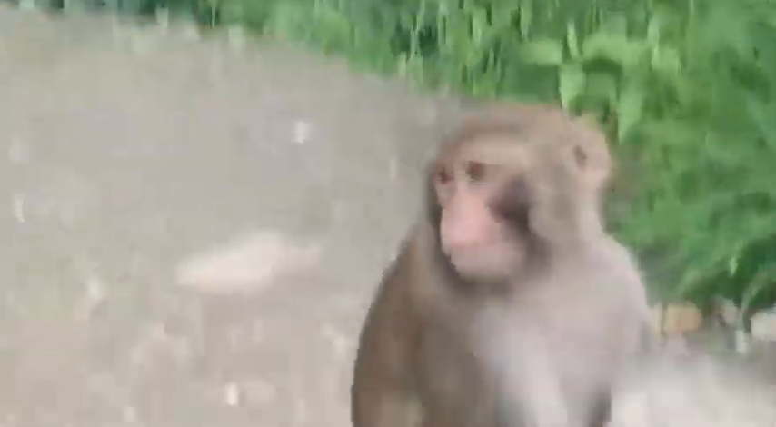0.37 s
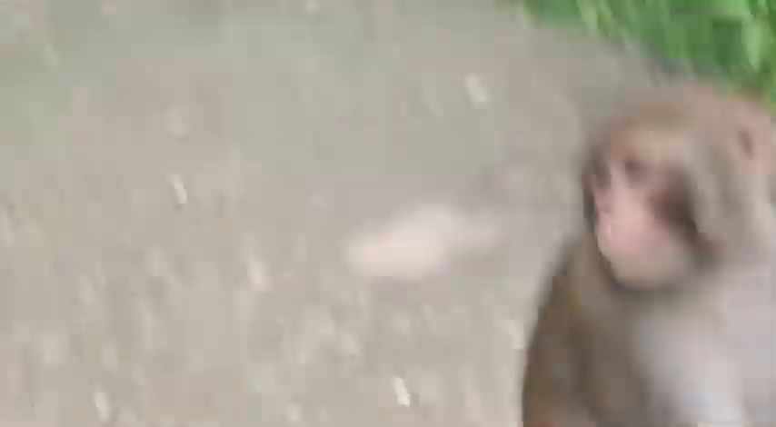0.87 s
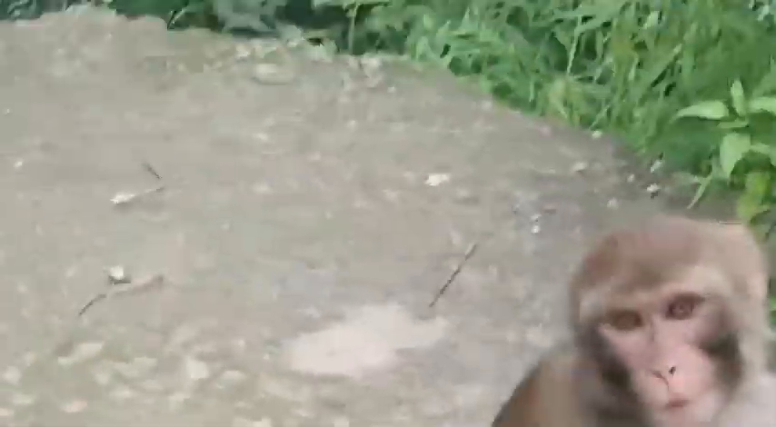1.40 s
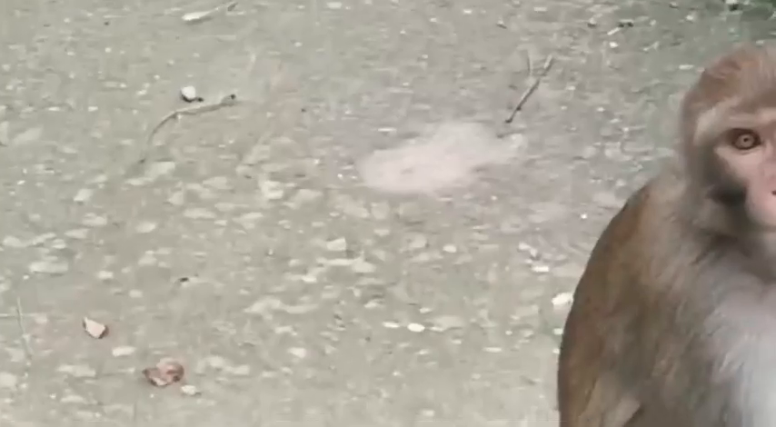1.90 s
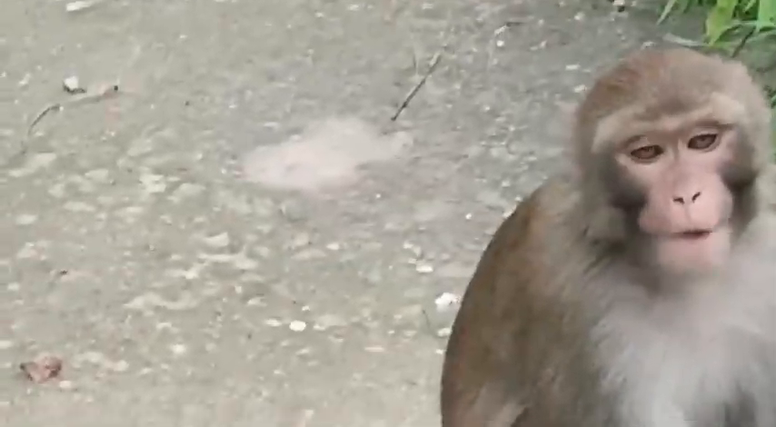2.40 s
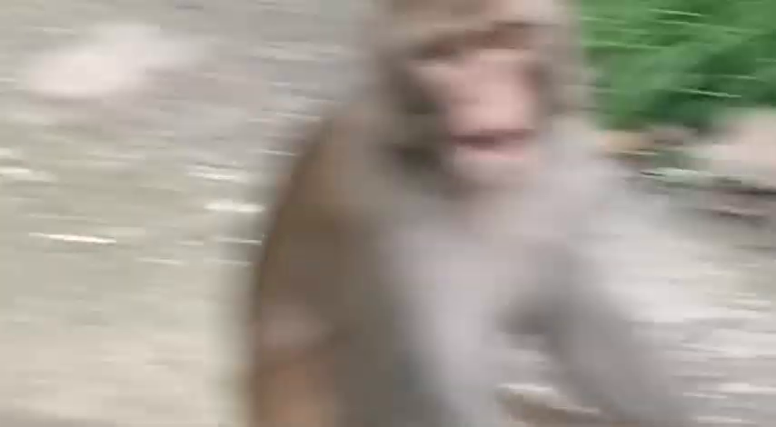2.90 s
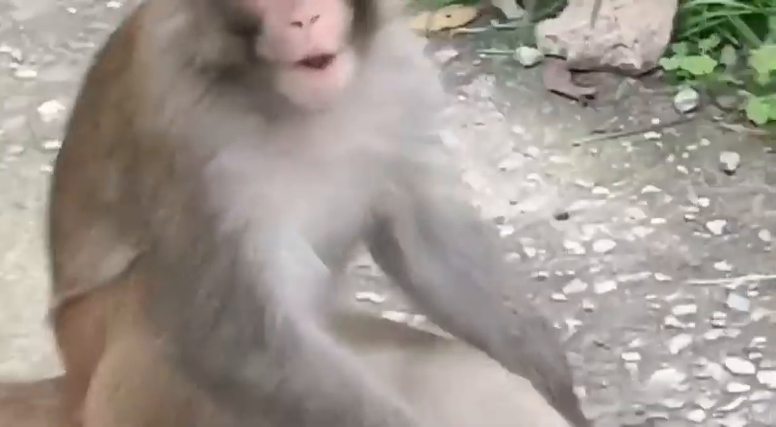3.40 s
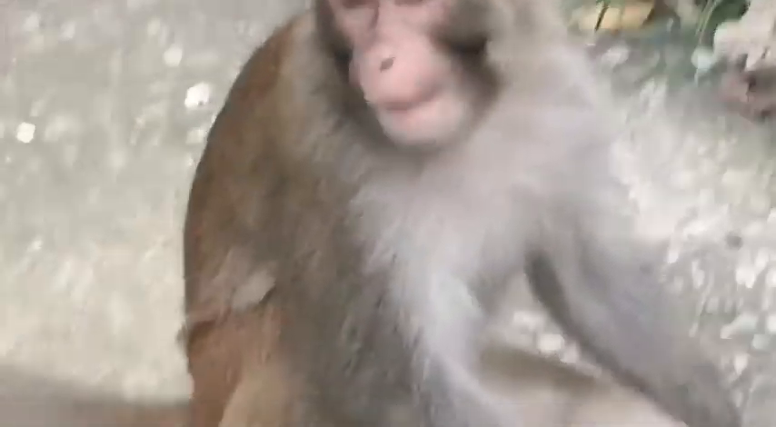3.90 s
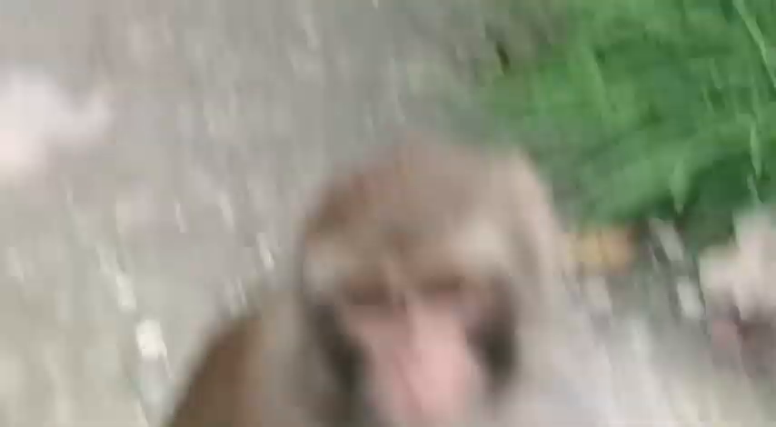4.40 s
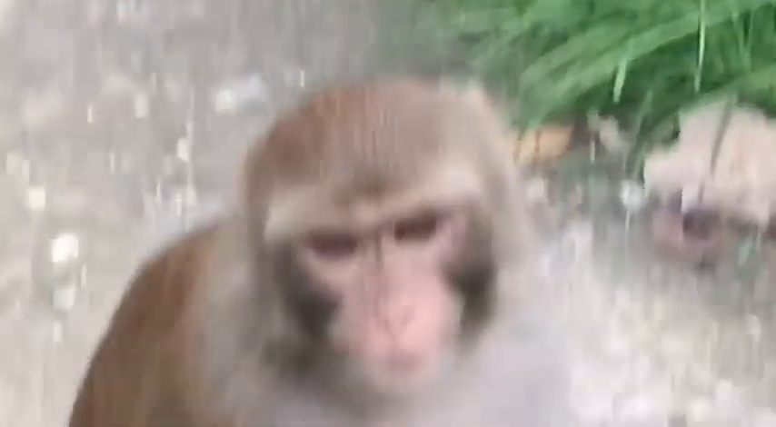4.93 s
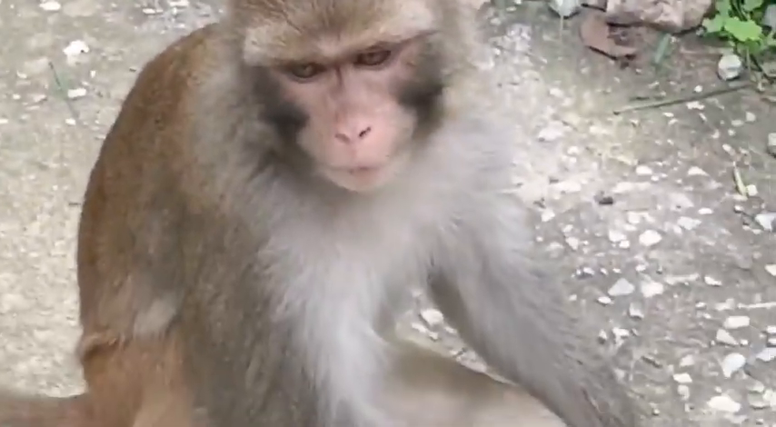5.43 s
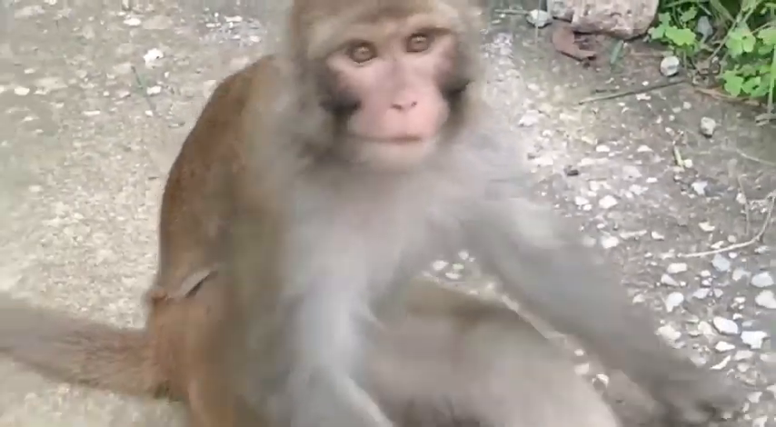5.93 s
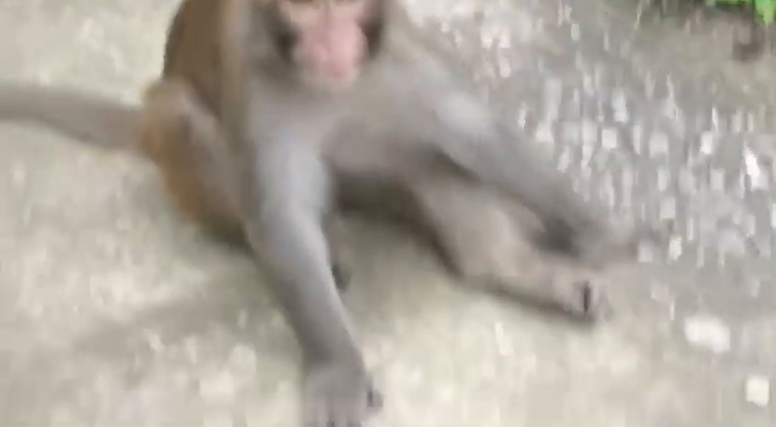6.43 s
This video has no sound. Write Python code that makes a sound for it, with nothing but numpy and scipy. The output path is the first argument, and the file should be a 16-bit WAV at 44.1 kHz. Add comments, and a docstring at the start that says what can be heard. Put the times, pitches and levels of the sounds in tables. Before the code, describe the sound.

Many small songbirds whistle, chip, trill and churr over one another among trees, with a near bird slurring down and up late on.

```python
"""A falling whistle opens, close by, and at once a high trill of upward flicks starts that ends in a buzz.
Small songbirds whistle, chip and churr across it in a wood; late on, a near bird slurs a whistle down and up.
Each bird is a gliding near-pure tone, echoed by the trees. Random chips blurred by echo make a far twitter,
its high band mostly heard as the trill's echo. A faint flickering rumble and a hiss, both filtered noise,
lie behind. The microphone hears almost nothing above 8 kHz."""
import sys
import numpy as np
from scipy import signal
from scipy.fft import rfft, irfft, next_fast_len
from scipy.io import wavfile
from scipy.ndimage import uniform_filter1d, map_coordinates

SR = 44100
rng = np.random.default_rng(int(sys.argv[2]) if len(sys.argv) > 2 else 0)


def undo_db(level):
    """Turn decibels back into plain size, where 20 dB means ten times bigger."""
    steps = np.asarray(level, float) / 20
    return 10 ** steps


def wav_out(sig):
    """Save sig, one row per channel (or a flat mono array), as 16-bit PCM at SR to the path in sys.argv[1]."""
    wavfile.write(sys.argv[1], SR, np.round(np.clip(np.atleast_2d(sig).T, -1, 1) * 32767).astype(np.int16))


N = 289296

# Gliding notes of the nearer birds. Each row: start in seconds, length in seconds, start pitch in Hz,
# end pitch in Hz, peak level in dB before flutter and echo.
GLIDE_NOTES = [(0, 0.039, 2480, 2164, -16.5), (0.087, 0.094, 3000, 2573, -19),
               (0.203, 0.025, 3510, 3700, -34.5), (0.211, .049, 1920, 1460, -42),
               (0.313, 0.02, 3460, 3606, -24.5), (0.375, 0.073, 1640, 1792, -41.5),
               (0.396, .026, 2100, 2045, -36), (0.41, 0.022, 3620, 3600, -24),
               (0.426, 0.027, 2174, 2700, -29), (0.446, 0.065, 2595, 2553, -19.5),
               (.65, 0.012, 5580, 4526, -19.5), (.768, .03, 4650, 4440, -22),
               (0.789, 0.082, 4460, 4400, -17), (.89, 0.028, 3560, 3046, -20),
               (0.956, 0.034, 3520, 2693, -22), (1.034, 0.034, 2327, 1534, -38.5),
               (1.159, 0.065, 2480, 2150, -31), (1.209, 0.097, 2242, 2210, -35.5),
               (1.251, 0.055, 5020, 3990, -32), (1.414, 0.037, 5250, 3570, -33),
               (1.424, 0.045, 3530, 2734, -30), (1.47, 0.025, 5290, 3600, -30),
               (1.535, 0.0085, 4960, 5040, -23.5), (1.564, 0.02, 4270, 3230, -26.5),
               (1.672, 0.015, 4610, 4770, -27.5), (1.689, 0.069, 4220, 3290, -34.5),
               (1.731, .036, 3350, 2884, -25), (1.845, 0.037, 3250, 3970, -33.5),
               (1.874, 0.027, 3160, 2446, -23.5), (1.878, .029, 4730, 4880, -28),
               (1.911, .021, 4430, 3580, -26), (1.914, 0.047, 2370, 2883, -29),
               (2.098, 0.075, 2250, 2176, -48.5), (2.114, .028, 5320, 5070, -21.5),
               (2.177, 0.0083, 3500, 3536, -19), (2.217, 0.025, 3670, 3400, -20.5),
               (2.324, 0.051, 2170, 2680, -33.5), (2.368, .115, 1710, 1754, -38.5),
               (2.416, 0.028, 3980, 3640, -34), (2.501, 0.028, 4300, 3940, -25),
               (2.592, 0.028, 4450, 3550, -38.5), (2.606, 0.045, 4530, 3960, -38),
               (2.673, .054, 2650, 1963, -25.5), (2.722, .094, 2050, 1794, -40.5),
               (2.848, .028, 6030, 4480, -26.5), (2.912, .05, 3630, 4230, -24),
               (2.953, 0.014, 5550, 4130, -28.5), (3.001, 0.073, 3900, 4060, -24.5),
               (3.083, 0.02, 3340, 3070, -24), (3.138, 0.023, 3440, 3050, -26),
               (3.302, .03, 3770, 2830, -21.5), (3.416, .028, 4600, 4600, -25.5),
               (3.425, 0.083, 5120, 5260, -31), (3.614, 0.097, 6440, 6450, -35),
               (3.726, 0.043, 4170, 3770, -23), (3.757, 0.036, 3970, 4280, -21.5),
               (3.928, 0.029, 6520, 6666, -20), (4.245, .054, 6480, 6220, -12.5),
               (4.254, .15, 6530, 6637, -10), (4.541, 0.042, 5730, 4100, -33),
               (4.578, 0.055, 3190, 2450, -41), (4.752, 0.057, 3240, 2840, -28),
               (4.862, 0.013, 3870, 5900, -18.5), (4.885, 0.026, 5340, 4800, -21),
               (5.057, .018, 3790, 5780, -14.5), (5.072, 0.03, 5500, 4450, -18),
               (5.146, 0.041, 2620, 2640, -34), (5.517, 0.019, 2840, 2695, -27.5),
               (6.107, 0.024, 4050, 4770, -16.5), (6.152, 0.029, 4380, 5190, -16.5),
               (6.22, .1, 4440, 3990, -22), (6.377, 0.046, 7650, 6730, -37.5),
               (6.401, 0.022, 6810, 5890, -18.5), (6.546, 0.023, 7340, 6436, -23.5)]
GLIDE_HALFWAY = .56  # share of the glide done at the middle of the note
# Arched notes. Each row: start in seconds, length in seconds, pitch at both ends in Hz, middle pitch in Hz,
# peak level in dB before flutter and echo.
ARCHED_NOTES = [(0.345, 0.032, 2176, 2016, -34.5), (0.737, 0.024, 2140, 2403, -27.5),
                (1.31, .049, 1590, 1775, -44), (1.343, .015, 3710, 4080, -26),
                (1.548, .022, 4100, 4430, -20), (1.655, .032, 2840, 2144, -36),
                (2.931, 0.016, 4770, 5270, -23.5), (2.948, .035, 4280, 4680, -18.5),
                (3.279, 0.075, 4660, 4350, -26.5), (3.526, 0.035, 3373, 3504, -27),
                (3.674, .052, 4480, 5173, -21.5), (3.986, .028, 4833, 5120, -11),
                (3.997, .122, 5314, 4900, -24), (4.273, 0.054, 3444, 3320, -28.5),
                (4.399, 0.13, 3825, 4006, -29), (4.605, 0.022, 3750, 3910, -26),
                (4.836, 0.025, 6520, 6400, -26.5), (5.032, 0.034, 6640, 6420, -16.5)]
# Rolls of rising steps. Each row: start in seconds, length in seconds, start pitch in Hz, end pitch in Hz,
# peak level in dB before flutter and echo.
RISING_ROLLS = [(2.546, .088, 2245, 2743, -21.5), (2.692, .11, 2664, 3396, -23)]
ROLL_STEPS_PER_S = 50

# Pitch ranges of the far twitter's three bands. Each row: low in Hz, high in Hz.
TWITTER_BANDS = [(2100, 4200), (3600, 5700), (5650, 7200)]
# Swells of blurred twitter, one list for each of the three bands; the high one is mostly the trill's echo.
# Each row: start in seconds, end in seconds, rms level in dB.
TWITTER_SWELLS = [
    [(-.2, .08, -25.5), (.08, .8, -36.5), (1.7, 2.2, -34.5), (2.4, 4.35, -34), (4.75, 5.05, -37),
     (5.1, 5.8, -42), (5.95, 6.45, -41), (4.52, 4.68, -42)],
    [(-.2, .1, -30.5), (.6, 1.1, -36.5), (1.4, 2.4, -38.5), (2.4, 4.25, -35), (4.4, 4.8, -41),
     (4.8, 5.33, -31.5), (5.4, 5.8, -40), (5.85, 6.05, -46), (6.05, 6.6, -36)],
    [(.28, 1.2, -33.5), (1.1, 2.45, -26.5), (2.45, 3.42, -39.5), (3.85, 4.08, -36.5), (4.22, 4.4, -31.5),
     (4.45, 5.7, -44.5), (4.97, 5.28, -37), (5.65, 5.8, -34), (6.2, 6.4, -51.5), (6.47, 6.8, -32.5)],
]
SWELL_EDGE_S = 0.11  # rise and fade
BETWEEN_DB = (-59, -50.5, -45.5)  # what still sounds between swells, by band

# Low rumble. Each row: time in seconds, rms level in dB.
RUMBLE_LEVEL = [(0, -70.5), (.36, -57), (.47, -67.5), (.58, -58.5), (.72, -64.5), (.78, -69), (2.3, -76),
                (2.52, -62), (2.9, -59.5), (2.96, -69), (3.05, -57.5), (3.53, -51.5), (4.24, -52),
                (4.33, -56), (4.68, -54), (5.66, -51), (5.74, -66.5), (6.17, -55), (6.27, -72.5),
                (6.56, -60.5)]
# Tone of the rumble. Each row: frequency in Hz, relative level in dB.
RUMBLE_TONE = [(88, -63), (150, -37.5), (222, -25), (399, -5), (538, 4.5), (954, -7.5), (1410, 2),
               (1910, 1), (2050, -35.5), (2600, -39), (3380, -35), (5720, -120)]
# Moments when the low rumble flickers up. Each row: time in seconds, 6 ms ahead of the height;
# level at the height in dB.
RUMBLE_FLICKERS = [(0.266, -56.5), (.329, -63), (.599, -56), (.678, -58), (.717, -61), (1.02, -49.5),
                   (1.064, -59.5), (1.245, -59), (1.735, -60), (1.81, -56), (2.07, -57.5), (4.279, -44),
                   (5.781, -59), (6.219, -56.5), (6.324, -49.5)]
# Tone of these flickers. Each row: frequency in Hz, relative level in dB.
RUMBLE_FLICKER_TONE = [(60, -26), (150, 3), (500, 2.5), (1300, 7), (1800, 7.5), (2500, -64)]
# Between the trill's flicks the low noise flickers up briefly around 1.2 kHz.
# By phrase: delay after the flick in seconds, usual level in dB; then the scatter of that level in dB.
GAP_FLICKER_AFTER_S, GAP_FLICKER_DB, GAP_SCATTER_DB = (0.0062, 0.022, 0.016), (-58.5, -61, -67.5), 2
# Tone of the noise in those gaps. Each row: frequency in Hz, relative level in dB.
GAP_FLICKER_TONE = [(500, -30), (900, -8), (1250, 1.5), (1600, -10.5), (2100, -35.5), (2600, -81)]
# Steady hiss of the wood. Each row: frequency in Hz, relative level in dB.
HISS_TONE = [(880, -60), (1500, -25), (2910, -5), (3680, -8), (4110, -2.5), (6460, -3.5), (7180, -21.5),
             (7760, -32.5), (8100, -80), (10500, -109), (17800, -120)]
# Deep murmur. Each row: frequency in Hz, relative level in dB.
MURMUR_TONE = [(12, -37.5), (20, 4.5), (59, -12.5), (354, -22.5), (653, -20.5), (1050, -29.5), (1250, -2.5),
               (1500, -16.5), (1950, -39), (3300, -120)]
HISS_DB, MURMUR_DB = -37, -73.5  # rms

# The trill's phrases. Each row: first flick in seconds, first gap in seconds, growth of the gap in seconds a flick.
TRILL_PHRASES = [(.0375, .1125, -.0005), (.9991, .0595, .0007), (1.8342, .0717, .0001)]
# How many flicks each phrase holds, one count a phrase.
FLICK_COUNTS = [9, 13, 8]
# The flick in each phrase. Each row: rise in seconds, rest in seconds, lowest pitch in Hz, usual top pitch in Hz,
# growth in level over the climb in dB.
FLICK_SHAPES = [(.0105, 0.0039, 3701, 6660, 15), (.0125, .009, 4498, 6540, 19.5),
                (.016, .0056, 4310, 6460, 16)]
# Ticks in each phrase, one list a phrase. Each row: seconds after the flick, level in dB against the song's effort.
TRILL_TICKS = [
    [(-.0155, -14.5)],
    [(.0295, -7.5)],
    [(.027, -13), (.046, -14)],
]
# The triller's effort. Each row: time in seconds, peak level in dB before scatter.
TRILL_EFFORT = [(0, -21), (.2, -12), (.8, -6.5), (1, -10), (1.08, -1.5), (1.2, -6), (1.6, -13.5),
                (2.02, -4.5), (2.35, -11)]
FLICK_SCATTER_DB, TOP_SCATTER_HZ, TICK_SCATTER_HZ = 3, 83, 190
# The buzz that ends the trill. Each row: time in seconds, low pitch in Hz, peak level in dB before wavering.
TRILL_BUZZ = [(2.3, 5860, -90), (2.37, 5773, -22), (2.75, 5740, -24), (2.94, 5695, -21.5),
              (2.98, 5385, -24.5), (3.22, 5480, -27.5), (3.3, 5130, -94.5)]
BUZZ_TOP_HZ = 6720

# Churrs, fast falling sweeps. Each row: start in seconds, length in seconds, low pitch in Hz, high pitch in Hz,
# peak level in dB before wavering.
CHURR_NOTES = [(0.216, 0.028, 2050, 3110, -28.5), (0.621, 0.085, 4116, 6580, -29.5),
               (1.748, 0.079, 2700, 3600, -37), (2.906, 0.066, 3633, 5530, -19.5),
               (3.072, 0.12, 2687, 3580, -30), (3.465, .1, 2553, 3590, -30), (3.699, 0.06, 3956, 5450, -23),
               (3.765, .12, 2686, 3492, -30), (4.724, 0.048, 3440, 5440, -34.5),
               (4.8, .145, 1509, 3072, -26.5), (4.89, 0.075, 4055, 5320, -25.5),
               (5.085, 0.07, 3643, 5500, -20.5), (5.211, .14, 1490, 3218, -22),
               (6.127, 0.085, 3780, 4994, -22.5)]
SWEEPS_PER_S, MORE_PER_KHZ = 45, 11  # higher churrs sweep faster

# The near bird's calls. Each row: start in seconds, stretch in time as a factor, gain in dB,
# swell from start to end in dB.
SLURRED_CALLS = [(5.661, .99, 1.5, -1), (6.186, 1.03, -3, 0)]
# Its falling and rising whistle. Each row: seconds into the unstretched call, pitch in Hz, rms level in dB
# before the call's gain and swell.
SLUR_SHAPE = [(0, 2612, -31.5), (0.022, 2560, -19), (0.045, 2250, -13), (.07, 2049, -18),
              (0.1, 2090, -17.5), (.119, 2700, -27), (0.139, 3073, -17.5), (0.168, 3050, -8.5),
              (0.199, 2887, -9), (0.234, 2728, -13), (0.254, 2707, -25.5)]

# Echo of the trees. Each row: frequency in Hz, time to fall by 60 dB in seconds.
TREE_ECHO = [(1500, 2.16), (3000, 1.56), (5000, 1.2), (7000, 0.8)]
# Response of the microphone. Each row: frequency in Hz, gain in dB.
MICROPHONE_RESPONSE = [(20, -28.5), (70, 2.5), (6800, -2), (7200, -1), (7600, -3.5), (7800, -25.5),
                       (8200, -40), (8300, -110)]


def unit(x):
    """Scaled to rms 1."""
    return x / np.sqrt(np.mean(x ** 2) + 1e-20)


def along(points, hz):
    """Reads (Hz, value) points on a log frequency axis."""
    f, v = np.transpose(points)
    return np.interp(np.log(hz + 1), np.log(f + 1), v)


def curves(rows):
    """One value per sample for each column after the time."""
    s, *cols = np.transpose(rows)
    return [np.interp(np.arange(N) / SR, s, c) for c in cols]


def wobble(rate, size=N):
    """A smooth random curve, rate knots a second."""
    return map_coordinates(rng.standard_normal(N // 64), [np.arange(size) * rate / SR])


def coloured(x, spectrum):
    """Sound through a (Hz, dB) response."""
    m = next_fast_len(N + 8192)
    response = undo_db(along(spectrum, np.fft.rfftfreq(m, 1 / SR)))
    return irfft(rfft(x, m) * response, m)[..., :N]


def patchy(spectrum, depth_db, wide, long):
    """Noise of rms 1 whose gain varies in patches, wide bins by long frames."""
    t, z = signal.stft(rng.standard_normal(N), nperseg=512)[1:]  # t counts samples
    field = uniform_filter1d(rng.standard_normal(z.shape), wide, 0)
    field = uniform_filter1d(field, long, 1)
    depth = np.interp(t, np.arange(N), depth_db * np.ones(N))
    gain = undo_db(depth * unit(field))
    z = z * gain / np.sqrt(np.mean(gain ** 2, axis=0))
    return unit(coloured(signal.istft(z, nperseg=512)[1][:N], spectrum))


def add(track, s, sound):
    """Lays a sound on the track at time s."""
    room = track[max(round(s * SR), 0):][:len(sound)]
    room += sound[:len(room)]


def bursts(rows, width_s):
    """A bell-shaped gate for each (s, peak dB)."""
    gate, t = np.zeros(N), np.arange(-.012, .012, 1 / SR)
    for s, peak_db in rows:
        add(gate, s - .006, undo_db(peak_db) * np.exp(-(t / width_s) ** 2))
    return gate


def sine(hz, second_db=-40, third_db=-60):
    """The syrinx: a near-pure tone with overtones at two and three times its pitch."""
    phase = 2 * np.pi * np.cumsum(hz) / SR
    return np.sin(phase) + undo_db(second_db) * np.sin(2 * phase) + undo_db(third_db) * np.sin(3 * phase)


def glide(length, start_hz, middle_hz, end_hz, edge, waver_hz=0):
    """A note whose pitch bends through three points and may waver, with soft ends."""
    u = np.linspace(0, 1, round(length * SR))
    slope, bend = end_hz - start_hz, 2 * (start_hz + end_hz - 2 * middle_hz)
    hz = middle_hz + slope * (u - .5) + bend * (u - .5) ** 2
    if waver_hz:
        hz = hz + waver_hz * wobble(100, size=len(u))
    return sine(hz) * signal.windows.tukey(len(u), np.clip(edge, 0, 1))


def trees(x, near_db, near_s, far_db):
    """Direct sound, a quick scatter off leaves and a long echo off trunks, new for every moment."""
    out, step = np.zeros(N + 2 * SR), SR // 5
    t, fade = np.arange(SR // 8) / SR, np.hanning(2 * step + 1)[:-1]
    padded = np.pad(x, (step, 2 * step))
    for k in range(0, N + step, step):
        hz, s, z = signal.stft(rng.standard_normal(SR), SR, nperseg=256)
        decay = undo_db(-60 * s / along(TREE_ECHO, hz)[:, None])
        trunks = signal.istft(z * decay, SR, nperseg=256)[1][:SR]
        leaves = rng.standard_normal(len(t)) * undo_db(-60 * t / near_s)
        tail = undo_db(far_db) * trunks / np.linalg.norm(trunks)
        tail[:len(t)] += undo_db(near_db) * leaves / np.linalg.norm(leaves)
        add(out, k / SR + .004, signal.fftconvolve(fade * padded[k:k + 2 * step], tail))
    return x + out[step:step + N]


def beats():
    """(phrase, s) of every flick of the trill: within a phrase the gaps change evenly."""
    return [(p, first + gap * k + growth * k * (k - 1) / 2)
            for p, (first, gap, growth) in enumerate(TRILL_PHRASES) for k in range(FLICK_COUNTS[p])]


def whistlers():
    """Notes of the nearer birds, and rolls that climb in small upward steps; moving air makes them flutter."""
    out = np.zeros(N)
    notes = [(s, length, a, a + GLIDE_HALFWAY * (b - a), b, db) for s, length, a, b, db in GLIDE_NOTES]
    notes += [(s, length, ends, middle, ends, db) for s, length, ends, middle, db in ARCHED_NOTES]
    for s, length, start_hz, middle_hz, end_hz, db in notes:
        add(out, s, undo_db(db) * glide(length, start_hz, middle_hz, end_hz, edge=0.31, waver_hz=64.8))
    for s, length, start_hz, end_hz, db in RISING_ROLLS:
        t = np.arange(0, length, 1 / SR)
        cycle = t * ROLL_STEPS_PER_S % 1
        hz = start_hz + (end_hz - start_hz) * (t / length) ** 0.47 + 500 * (cycle - .5)
        pulses = np.sin(np.pi * cycle ** 0.9) * signal.windows.tukey(len(t), .12)
        add(out, s, undo_db(db) * pulses * sine(hz))
    flutter = undo_db(2.6 * wobble(90))
    return trees(out * flutter, near_db=-3, near_s=0.17, far_db=-7.0)


def far_twitter():
    """Very many quick chips at random, blurred by echo into three bands of distant twitter that swell and fade."""
    out, t = np.zeros(N), np.arange(N) / SR
    for (low_hz, high_hz), rows, between_db in zip(TWITTER_BANDS, TWITTER_SWELLS, BETWEEN_DB):
        notes = np.zeros(N)
        for when, start, end, length, size in rng.random((1500, 5)):
            # averaging two draws puts most chips mid-range
            start_hz = low_hz + (high_hz - low_hz) * (start + end) / 2
            end_hz = low_hz + (high_hz - low_hz) * (end + size) / 2
            chip = glide(0.00789 + 0.01523 * length, start_hz, (start_hz + end_hz) / 2, end_hz, edge=0.13)
            add(notes, when * N / SR, undo_db(1.4 * size) * chip)
        blur = trees(notes, near_db=-1.0, near_s=0.065, far_db=5)
        swells = [undo_db(db) * np.clip(.5 + np.minimum(t - a, b - t) / (2 * SWELL_EDGE_S), 0, 1)
                  for a, b, db in rows]
        level = np.sqrt(undo_db(between_db) ** 2 + np.sum(np.square(swells), axis=0))
        # evened out over a quarter second, so that the swells set the level
        out += level * blur / np.sqrt(np.abs(uniform_filter1d(blur ** 2, size=SR // 4)) + 1e-9)
    return out


def background():
    """Filtered noise: a low rumble that flickers, most when faint and in the trill's gaps, a hiss, a deep murmur."""
    db, = curves(RUMBLE_LEVEL)
    depth_db = np.clip(4.0 + 0.33 * (-58.0 - db), 1, 10.5)
    rumble = undo_db(db) * patchy(RUMBLE_TONE, depth_db, wide=3, long=3)
    gap_rows = [(s + GAP_FLICKER_AFTER_S[p], GAP_FLICKER_DB[p] + GAP_SCATTER_DB * rng.standard_normal())
                for p, s in beats()]
    rumble_flickers = bursts(RUMBLE_FLICKERS, width_s=0.0085) * patchy(RUMBLE_FLICKER_TONE, 4.7, wide=5, long=2)
    gap_flickers = bursts(gap_rows, width_s=0.0034) * patchy(GAP_FLICKER_TONE, 4, wide=5, long=2)
    hiss = undo_db(HISS_DB) * patchy(HISS_TONE, 4.8, wide=4, long=5)
    murmur = undo_db(MURMUR_DB) * patchy(MURMUR_TONE, 3.4, wide=2, long=8)
    return rumble + rumble_flickers + gap_flickers + hiss + murmur


def triller():
    """Each flick shoots up, growing louder, and rests on its top pitch; ticks go with it; a buzz ends the song."""
    out = np.zeros(N)
    for (p, s), chance in zip(beats(), rng.standard_normal((sum(FLICK_COUNTS), 6))):
        rise, rest, low_hz, usual_hz, growth_db = FLICK_SHAPES[p]
        # one level for the flick, then one for each tick; the pitches likewise
        db = np.interp(s, *np.transpose(TRILL_EFFORT)) + FLICK_SCATTER_DB * chance[::2]
        top_hz = usual_hz + TOP_SCATTER_HZ * chance[1]
        ticks_hz = usual_hz + TICK_SCATTER_HZ * chance[3::2]
        t = np.arange(-rise, rest, 1 / SR)
        climb = np.clip(-t / rise, 0, 1)  # 1 at the foot, 0 at the top
        accent_db = -5.1 * np.clip(climb / 0.022, 0, 1)  # a last lift on reaching the top
        fall_db = -13 * np.clip(t / rest, 0, 1)
        size = undo_db(db[0] + accent_db - growth_db * climb + fall_db) * signal.windows.tukey(len(t), .15)
        add(out, s + 0.003 - rise, size * sine(top_hz - (top_hz - low_hz) * climb ** 1.4))
        for (after, tick_db), effort_db, hz in zip(TRILL_TICKS[p], db[1:], ticks_hz):
            add(out, s + after, undo_db(effort_db + tick_db) * glide(0.0087, hz + 80, hz, hz - 80, edge=0.36))
    low_hz, db = curves(TRILL_BUZZ)
    swings_per_s = 140 * (1 + 0.37 * wobble(60))
    swing = .5 + .5 * np.cos(2 * np.pi * np.cumsum(swings_per_s) / SR)  # the pitch lingers at both turns
    out += undo_db(db + 3.3 * wobble(150)) * sine(low_hz + (BUZZ_TOP_HZ - low_hz) * swing)
    return trees(out, near_db=-5.5, near_s=0.037, far_db=-0.5)


def churrers():
    """A tone swept down again and again, so fast that it buzzes; each sweep is loudest early."""
    out = np.zeros(N)
    for s, length, low_hz, high_hz, db in CHURR_NOTES:
        count = round(length * SR)
        rate = SWEEPS_PER_S + MORE_PER_KHZ * high_hz * 1e-3
        cycle = np.cumsum(rate * (1 + 0.11 * wobble(50, size=count))) / SR % 1
        pulses = np.sin(np.pi * cycle ** 0.64) * signal.windows.tukey(count, .15)
        size = undo_db(db + 4.85 * wobble(100, size=count)) * pulses
        add(out, s, size * sine(high_hz - (high_hz - low_hz) * cycle))
    return trees(out, near_db=4.0, near_s=0.17, far_db=-2.5)


def near_bird():
    """A clean slurred whistle, strong at three times its pitch on the low notes, with a long echo."""
    out = np.zeros(N)
    into, hz, db = np.transpose(SLUR_SHAPE)
    for s, stretch, gain_db, swell_db in SLURRED_CALLS:
        t = np.arange(into[0], into[-1], 1 / (SR * stretch))
        smooth_hz = uniform_filter1d(np.interp(t, into, hz), size=300)
        third_db = np.interp(smooth_hz, [2100, 2500, 3000], [-15, -24, -60])
        level_db = gain_db + swell_db * (t / into[-1] - .5) + np.interp(t, into, db)
        size = np.sqrt(2) * undo_db(level_db) * signal.windows.tukey(len(t), .08)  # rms to peak
        add(out, s, size * sine(smooth_hz, second_db=-28.0, third_db=third_db))
    return trees(out, near_db=-5.0, near_s=0.084, far_db=-8.5)


def scene():
    """All the birds and the background, heard at one point in the wood."""
    return (whistlers() + far_twitter() + background() + triller() + churrers() + near_bird())[None]


def gain_control(x, threshold_db, slope, window_s, release_db):
    """Loud passages are turned down at once by a share of their excess; the gain creeps back by release_db a second."""
    size = max(round(window_s * SR), 1)
    level_db = 10 * np.log10(np.abs(uniform_filter1d(x ** 2, size=size)) + 1e-12)
    cut_db = np.clip(slope, 0, .9) * np.clip(level_db - threshold_db, 0, None)
    creep_db = release_db * np.arange(N) / SR
    return x * undo_db(creep_db - np.maximum.accumulate(cut_db + creep_db, axis=-1))


def band_limit(x):
    """A steep low-pass at the top of the band."""
    return signal.sosfilt(signal.butter(12, 8250, fs=SR, output="sos"), x)


def record(dry):
    """The microphone's band limit, then gain control."""
    heard = coloured(dry, MICROPHONE_RESPONSE)
    mix = gain_control(heard, threshold_db=-20.0, slope=0.77, window_s=0.008, release_db=44.5)
    return band_limit(mix)


dry = scene()
out = record(dry)
wav_out(out)
```